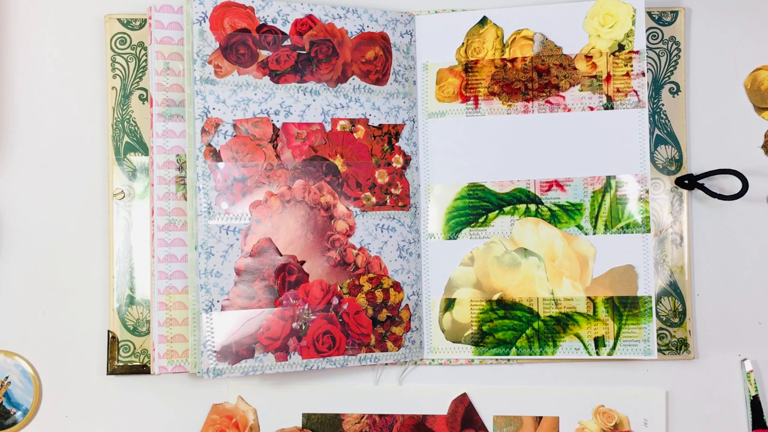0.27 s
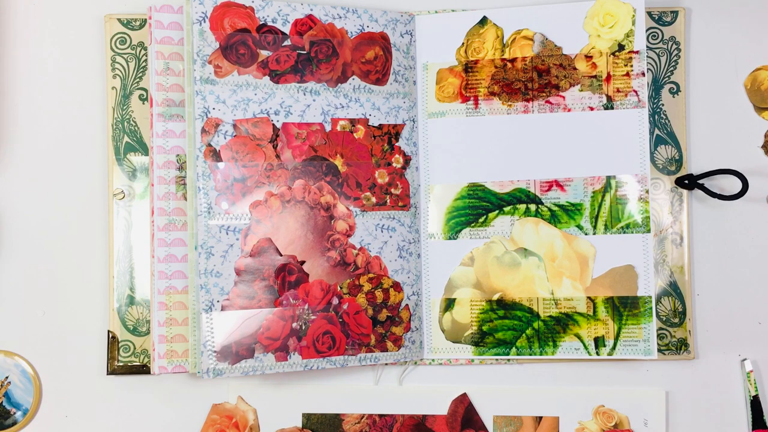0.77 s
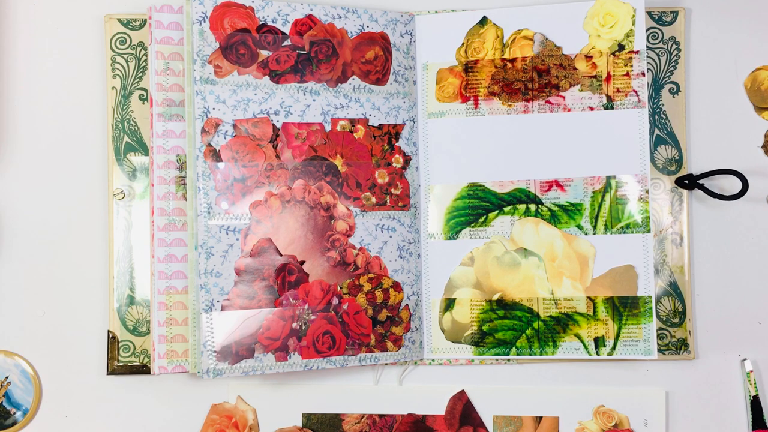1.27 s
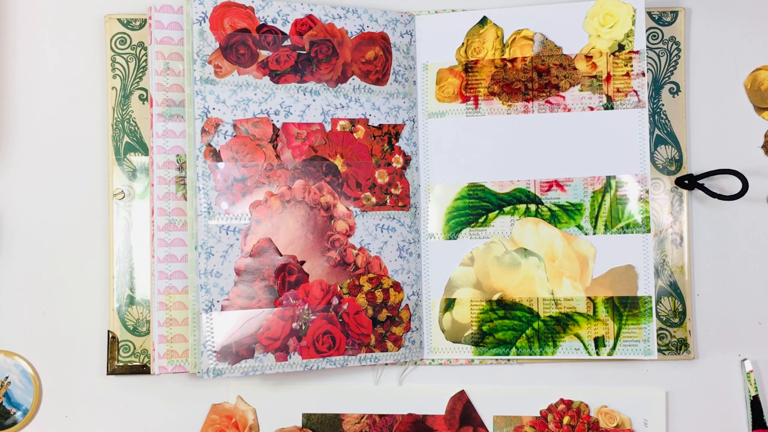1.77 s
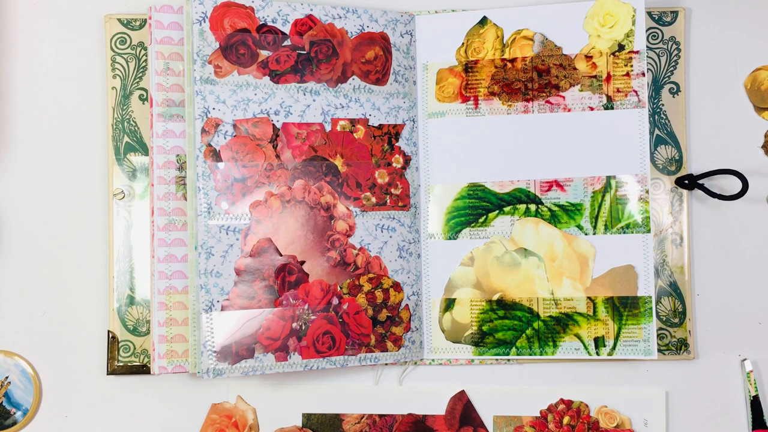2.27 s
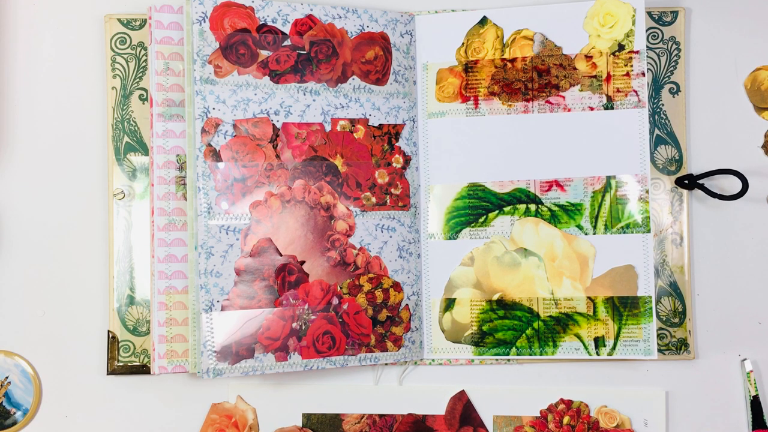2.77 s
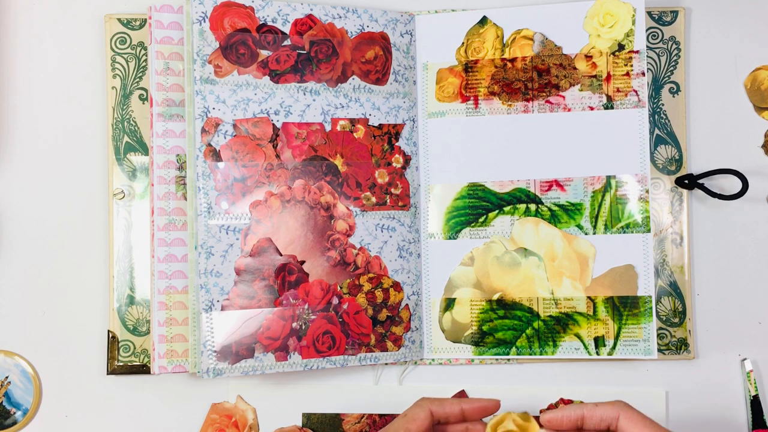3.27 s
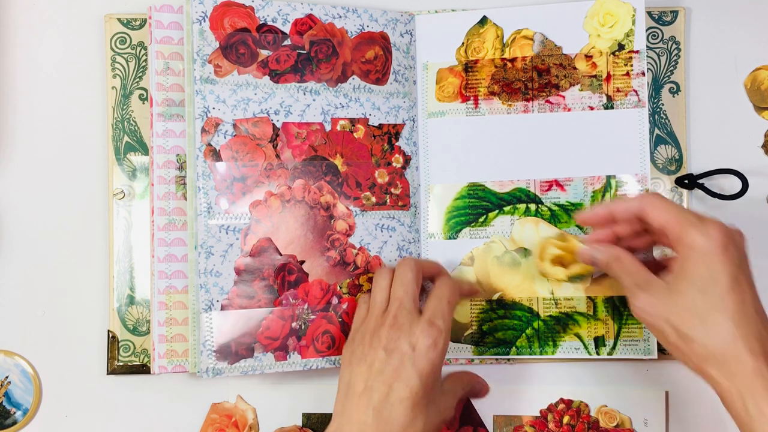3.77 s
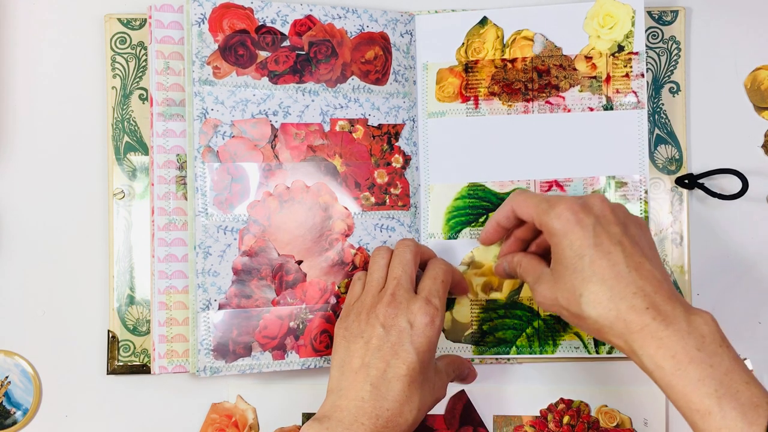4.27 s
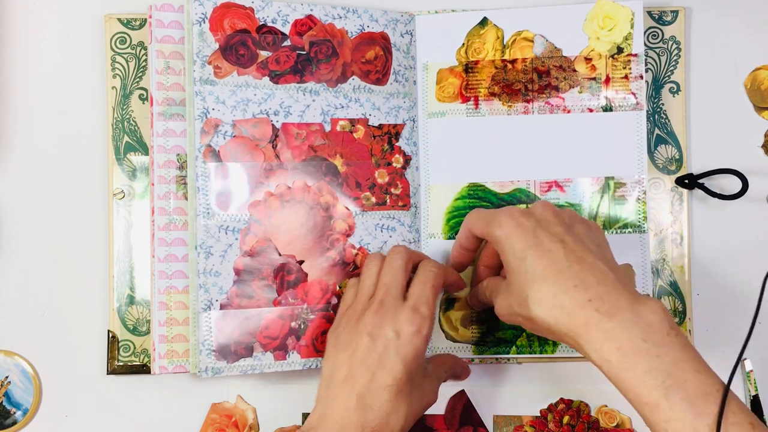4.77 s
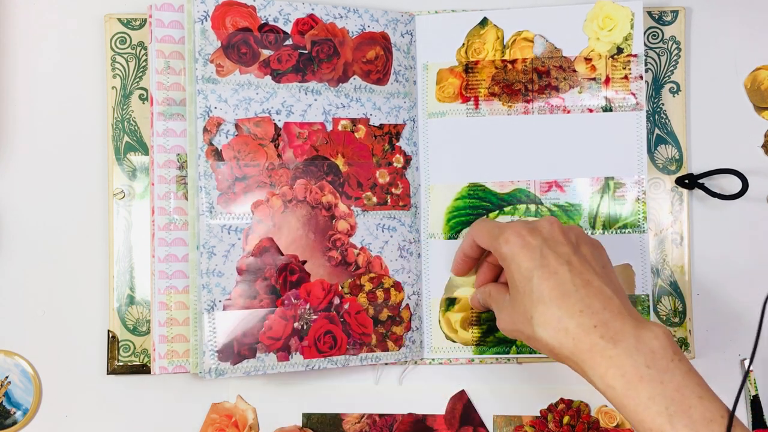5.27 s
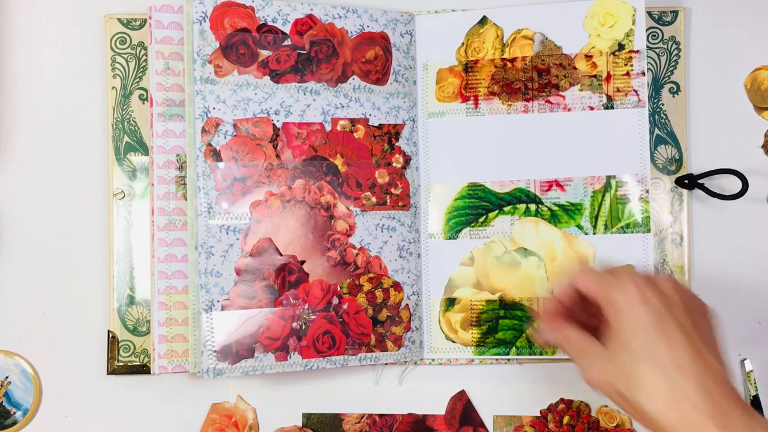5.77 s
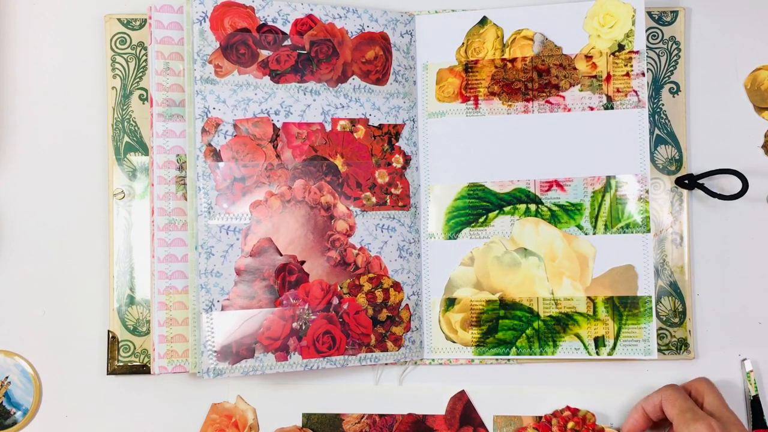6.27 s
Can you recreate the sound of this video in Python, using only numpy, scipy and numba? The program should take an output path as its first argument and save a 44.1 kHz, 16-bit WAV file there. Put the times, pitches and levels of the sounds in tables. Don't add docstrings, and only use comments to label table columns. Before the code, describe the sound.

A close, dry pickup of paper and plastic in a small quiet room with soft low rumble, hiss, faint hum and a very distant engine drone. From 0 to 0.5 seconds paper rustles lightly on film with tiny ticks, then nearly stops. At about 1 second crackling begins; a sharp crease snap breaks out near 1.27, followed by grainy scuffs and small ticks to 1.6. Around 1.9 to 2.2 come brisk rubs, a sleeve brush, a soft fingertip knock and dull board taps. Sparse crackles continue to 3, then a lull. From 3.6 hands brush and paper slides along the pocket, strongest at 4.2 to 4.6, with a loud bright snap at 4.69. It thins to faint rubbing, small ticks near 5.6 and 5.7, then a crisp scuff and sharp tick at 6.3 before settling.

```python
import sys
import numpy as np
from scipy import signal
from scipy.fft import rfft, irfft, next_fast_len
from scipy.io import wavfile
from scipy.ndimage import uniform_filter1d
from numba import njit

SR = 44100
rng = np.random.default_rng(int(sys.argv[2]) if len(sys.argv) > 2 else 0)


def wav_out(sig):
    wavfile.write(sys.argv[1], SR, np.round(np.clip(np.atleast_2d(sig).T, -1, 1) * 32767).astype(np.int16))


def to_linear_factor(level_db):
    exponent = np.asarray(level_db, float) / 20
    return 10 ** exponent


N = 287001
T = np.arange(N) / SR


def noise(*shape):
    return rng.standard_normal(shape or N)


def level(x, db):
    return x * to_linear_factor(db) / np.sqrt(np.mean(x ** 2))


def curves(table):
    s, *columns = np.transpose(table)
    return [np.interp(T, s, c) for c in columns]


def shape(x, gain):
    count = x.shape[-1]
    size = next_fast_len(count)
    hz = np.fft.rfftfreq(size, 1 / SR) + 0.0011
    return irfft(rfft(x, size) * gain(hz), size)[..., :count]


def band(x, lo_hz, hi_hz, order=2):
    def gain(f):
        low_side = 1 + (lo_hz / f) ** (2 * order)
        high_side = 1 + (f / hi_hz) ** (2 * order)
        return 1 / np.sqrt(low_side * high_side)

    y = shape(x, gain)
    return y / np.sqrt(np.mean(y ** 2, axis=-1, keepdims=True))


@njit
def moving_resonance(x, hz, q):
    y, b, l = np.empty(len(x)), 0., 0.
    for i in range(len(x)):
        g = np.tan(np.pi * hz[i] / SR)
        v = (b + g * (x[i] - l)) / (1 + g * (g + 1 / q))
        b, l, y[i] = 2 * v - b, l + 2 * g * v, v / q
    return y


def walk(rate):
    hold = int(SR / rate)
    steps = np.repeat(rng.standard_normal(N // hold + 1), hold)
    return 1.33 * uniform_filter1d(uniform_filter1d(steps, hold), hold)[:N]


def strokes(table, attack_s, release_s, extra_db=0):
    start_s, length_s, from_db, to_db = np.transpose(table)[:4, :, None]
    coarse = T[::32]
    t = coarse - start_s + attack_s / 2
    gate = np.clip(np.minimum(t / attack_s, (length_s + release_s - t) / release_s), 0, 1)
    lean_db = from_db + (to_db - from_db) * np.clip(t / length_s, 0, 1)
    return np.interp(T, coarse, np.sum(gate ** 2 * to_linear_factor(extra_db + lean_db), axis=0))


def kinds(tables, shared):
    rows = [(*row, *extra) for table, extra in zip(tables, shared) for row in table]
    return np.array(rows).T[..., None]


def add(out, s, rows):
    for k, row in zip((s * SR).astype(int), rows):
        out[k:k + len(row)] += row
    return out


# pitch_hz [Hz], level_db [dB per Hz]
HISS_COLOUR = [(88, -37), (150, -8.5), (375, -6), (464, -8), (522, -10), (1710, -18), (2000, -14),
               (2340, -17), (2680, -18), (3020, -18.5), (15800, -21.5)]
# start_s [s], level_db [dB]
DRAUGHT_GUSTS = [
    (0, -47.5),
    (2.01, -47),
    (2.75, -51),
    (3.48, -44.5),
    (5.64, -45),
    (6.51, -47.5),
]


def room():
    hz, db = np.transpose(HISS_COLOUR)
    hiss = shape(noise(), lambda f: to_linear_factor(np.interp(np.log(f), np.log(hz), db)))
    plant_s, plant_slew_s = 2.22, 0.34
    load = 1 / (1 + np.exp((plant_s - T) / plant_slew_s))
    rumble_db, hum_db = -55 - 5.5 * load, -66.5 + 2 * load
    draught_db, = curves(DRAUGHT_GUSTS)
    draught = band(noise(), 3.8, 13.2, order=4) * to_linear_factor(draught_db)
    rumble = 1.05 * band(noise(), 9.8, 36, order=4) + 0.61 * band(noise(), 31, 53, order=3)
    hum = band(noise(), 95.7, 86.3, order=3) * to_linear_factor(hum_db - 0.5)
    return level(hiss, -74.6) + draught + rumble * to_linear_factor(rumble_db - 3.5) + hum


# start_s [s], pitch_hz [Hz], level_db [dB]
ENGINE_RUN = [
    (0, 107, -78.5),
    (.9, 111.9, -68.5),
    (2, 113.5, -75),
    (2.9, 120.7, -68),
    (3.5, 127.9, -79.5),
    (3.95, 137, -76),
    (4, 87.55, -81),
    (4.6, 96.1, -67),
    (5.5, 100.6, -70),
    (6.51, 102, -73.5),
]


def engine():
    hz, db = curves(ENGINE_RUN)
    turn = 2 * np.pi * np.cumsum(hz * (1 + 0.014 * walk(9))) / SR
    strong = np.sin(turn) * to_linear_factor(2.9 * walk(7.7))
    octave_below = np.sin(turn / 2) * to_linear_factor(4.0 + 2.4 * walk(4.16))
    return to_linear_factor(db + 4.5) * (strong + octave_below)


def walls(x, t60_s, wet_db):
    t = T[:SR // 4]
    tail = noise(len(t)) * np.exp(-np.log(1000) * t / t60_s) * np.minimum(t / 0.0014, 1)
    return x + to_linear_factor(wet_db) * signal.fftconvolve(x, tail / np.sqrt(np.sum(tail ** 2)))[:N]


# start_s [s], length_s [s], start_level_db [dB], end_level_db [dB]
SLEEVE_BRUSHES = [(0, 0.58, -94, -87), (0.932, 0.39, -84, -79), (1.973, 0.37, -77, -68.5),
                  (2.317, 0.4, -70.5, -73), (2.78, 0.16, -80, -89), (3.537, 0.46, -75, -78),
                  (4.036, 0.19, -67, -86), (4.215, 0.54, -71.5, -77), (4.9, 0.57, -84, -82),
                  (5.5, 0.34, -79.5, -69.5), (5.87, 0.29, -80, -88), (6.3, 0.099, -80, -78)]


def hands():
    cloth = noise() * to_linear_factor(1.83 * walk(90))
    press = strokes(SLEEVE_BRUSHES, attack_s=0.074, release_s=0.073) + to_linear_factor(-80.5)
    rustle = band(cloth, 220, 300) + 0.68 * band(cloth, 630, 740) + 0.27 * band(cloth, 820, 3000)
    brush = rustle * to_linear_factor(-5.5) * press
    knock_s, knock_hz, knock_db, knock_ms = 2.0743, 256, -38, 3
    approach_db, approach_ms = -49.5, 4.4
    before, t = np.minimum(T - knock_s, 0), np.maximum(T - knock_s, 0)
    approach = -to_linear_factor(approach_db) * (T < knock_s) * np.exp(before * 1000 / approach_ms)
    ring = np.cos(2 * np.pi * knock_hz * t)
    ring = ring + 0.74 * np.cos(2 * np.pi * 110 * t) + 0.28 * np.cos(2 * np.pi * 520 * t)
    knock = to_linear_factor(knock_db - 5) * ring * t / (t + 0.0001) * np.exp(-t * 1000 / knock_ms)
    return brush + approach + knock


# start_s [s], peak_level_db [dB], pitch_hz [Hz]
BOARD_NUDGES = [(.985, -70, 705), (1.014, -63, 770), (1.228, -64, 700), (1.245, -61, 706),
                (1.311, -60, 690), (1.421, -66, 830), (2.011, -62, 727), (2.054, -64, 700),
                (2.197, -53.5, 750), (2.538, -64, 730), (2.564, -56, 714), (4.155, -53, 720),
                (4.306, -63, 684), (6.327, -57, 817)]


def board():
    s, db, hz = np.transpose(BOARD_NUDGES)[..., None]
    attack_ms, decay_ms = 1.3, 6.7
    t = T[:2048]
    fade = (1 - np.exp(-t * 1000 / attack_ms)) * np.exp(-t * 1000 / decay_ms)
    ring = np.sin(2 * np.pi * hz * t) * fade
    return add(np.zeros(N + SR), s[:, 0], to_linear_factor(db + 2.5) * ring)[:N]


# start_s [s], peak_level_db [dB], pitch_hz [Hz], top_octave_db [dB]
CREASE_SNAPS = [(1.2649, -19.5, 6850, -34), (1.2685, -32, 7050, -20), (1.2718, -24.5, 5260, -5),
                (1.274, -30.5, 8220, -8), (1.5895, -43, 4720, -34), (1.8446, -39, 6400, -38),
                (2.0253, -32.5, 5900, -27), (2.0554, -39, 5860, -28), (2.074, -36, 2080, -12),
                (2.7029, -36.5, 1870, -46), (2.9394, -28.5, 7660, -21), (6.0028, -48, 4990, -32),
                (6.3924, -42.5, 7600, -7)]
BRIGHT_TICKS = [(.0382, -41.5, 8350, -13), (.0994, -48, 6750, -17), (.301, -43, 8360, -9),
                (.9847, -50, 7940, -15), (1.0448, -32.5, 4800, -34), (1.057, -46, 5210, -20),
                (1.113, -50, 7500, -17), (1.222, -44, 4500, -15), (2.121, -50, 5500, -20),
                (1.3164, -42, 4840, -19), (1.3273, -37.5, 4500, -35), (1.9714, -55, 6160, -22),
                (2.3318, -46.5, 7600, 4), (2.947, -42, 7960, -18), (4.3094, -44, 6610, 0),
                (4.5107, -47, 4300, -23), (4.6888, -15.5, 4400, -7), (4.879, -55, 4300, -13),
                (5.6362, -37, 5250, -6)]
DULL_TICKS = [(0.398, -50, 3510, -11), (1.0103, -42, 3400, -8), (1.306, -44.5, 3150, -19),
              (1.477, -50.5, 2903, -24), (1.4994, -51, 2920, -17), (1.5152, -54, 2660, -21),
              (1.5452, -39, 3100, -19), (2.175, -41, 3040, -29), (2.5361, -52, 2100, -21),
              (2.579, -44, 2140, -20), (2.6732, -44, 1700, -4), (2.9541, -37, 2370, -5),
              (4.038, -45, 3250, -10), (4.198, -53, 1840, -11), (5.7326, -38.5, 2030, -12),
              (5.879, -58, 2450, -6), (6.0874, -43.5, 3380, -21), (6.4017, -55.5, 2950, -14),
              (6.411, -47.5, 3530, -8), (6.469, -54, 1665, 18)]
TAPPING_TICKS = [(.8594, -55.5, 2970, -17), (1.0952, -42, 4670, -31), (1.424, -44.5, 7130, -21),
                 (1.5304, -50, 7370, -8), (1.8018, -53.5, 3050, -36), (2.1953, -40, 3500, -3),
                 (2.3361, -45.5, 2900, -14), (2.4354, -57, 1520, -26), (2.5627, -42.5, 6980, -28),
                 (3.0093, -55, 2300, -28), (3.1501, -46, 3980, -39), (3.737, -46, 4500, -13),
                 (4.136, -40.5, 2760, -10), (4.1558, -41, 1780, -7), (4.9841, -57, 1980, -22),
                 (5.0612, -48.5, 1640, -13), (6.3248, -23.5, 8250, -38)]
# page_body_db [dB], noise_t60_ms [ms], noise_db [dB], panel_ring [cycles]
TICK_TRAITS = [
    (-35, 3.4, -4.5, 3),
    (-34, 11.4, -3.5, 3.3),
    (-22, 10.6, 2, 5.4),
    (-14, 8.3, 1.5, 4.4),
]


def ticks():
    tables = CREASE_SNAPS, BRIGHT_TICKS, DULL_TICKS, TAPPING_TICKS
    s, db, hz, top_db, body_db, t60_ms, noise_db, cycles = kinds(tables, TICK_TRAITS)
    t, x = T[:2048], noise(len(s), 2048)
    fade = np.exp(-np.log(1000) * t * 1000 / np.maximum(t60_ms, 1)) * np.minimum(t / 0.00043, 1)
    fade = fade + 0.15 * fade ** 0.27
    burst = band(x, 1570, 7600) + to_linear_factor(top_db + 10.0) * band(x, 8200, 14000, order=4)
    burst = burst + 0.13 * band(x, hz / 0.77, hz * 1.13, order=3)
    panel = np.sin(2 * np.pi * hz * t) * (4000 / hz) ** 0.14
    panel = panel * np.exp(-t * hz / cycles) * np.minimum(t / 0.00015, 1)
    snap = to_linear_factor(noise_db) * burst * fade + 1.33 * panel
    snap = snap / np.abs(snap).max(axis=1, keepdims=True)
    tap = band(x, 390, 760) * np.exp(-t / .004) * np.minimum(t / 0.00054, 1)
    rows = to_linear_factor(db - 1.5) * (snap + to_linear_factor(body_db - 3.5) * tap)
    return add(np.zeros(N + SR), s[:, 0] + .0005, rows)[:N]


def grit(spread_db, flutter_db):
    slip_size = np.minimum(rng.exponential(size=N), 2 * np.pi)
    slips = noise() * to_linear_factor(spread_db * slip_size)
    flutter = to_linear_factor(flutter_db * walk(300) + flutter_db / 2 * walk(55))
    return level(slips * flutter, 0)


# top_s [s], level_db [dB], pitch_hz [Hz], rise_ms [ms], fall_ms [ms]
LOOSE_SCUFFS = [(.125, -56.5, 7500, 24, 32), (.32, -56.5, 8200, 50, 55), (1.226, -53, 7000, 1.6, 50),
                (1.552, -54, 11300, 3.5, 5.1), (1.588, -57, 5870, 7.7, 13), (2.031, -44.5, 6350, 13, 14),
                (2.05, -49, 6400, 9.3, 4), (2.128, -50.5, 7000, 7.4, 23.5), (2.19, -58, 9100, 9, 15),
                (2.337, -76, 8050, 3, 5.8), (2.66, -64.5, 7250, 16, 10), (2.955, -55.5, 6000, 8.1, 9.7),
                (3.6, -68, 12000, 18, 36), (4.905, -62, 5200, 7.6, 18), (4.93, -63, 8000, 13, 6),
                (5.619, -56, 5545, 6.1, 6), (5.638, -61.5, 9100, 4.5, 14.6), (6.163, -59.5, 8900, 18, 22),
                (6.245, -63, 7000, 7.3, 19)]
PRESSED_SCUFFS = [(1.013, -56.5, 5000, 2.6, 7.5), (1.046, -52.5, 5400, 6.2, 9.5),
                  (1.311, -57, 4500, 2.8, 11), (1.85, -65.5, 8000, 2.2, 23), (1.95, -63, 7460, 7, 10),
                  (3.19, -66.5, 4540, 31, 25), (4.068, -56.5, 3590, 9.1, 13), (4.152, -55, 4100, 14, 12),
                  (4.181, -56, 7960, 7.2, 7.9), (4.31, -60.5, 1500, 9.2, 4.4), (4.715, -59, 5000, 7, 9.1),
                  (5.888, -61, 12100, 5.3, 10), (6.322, -45.5, 6860, 5.3, 13), (6.35, -55, 9000, 6.8, 10)]


def scuffs(fibres):
    page_body_db = [-17.5], [-2.5]
    s, db, hz, rise_ms, fall_ms, body_db = kinds((LOOSE_SCUFFS, PRESSED_SCUFFS), page_body_db)
    lead = 4096
    k = np.arange(3 * lead)
    ms = (k - lead) * 1000 / SR
    x = fibres[(k + (s * SR).astype(int)) % N]
    swell = 2 / (np.exp(-ms / np.maximum(rise_ms, 1)) + np.exp(ms / np.maximum(fall_ms, 1)))
    patch = band(x, hz / 1.52, hz * 1.46, order=3)
    hiss = to_linear_factor(-9.5) * band(x, 1800, 12000, order=3)
    page = to_linear_factor(body_db) * band(x, 270, 1380)
    rows = to_linear_factor(db - 6.0) * swell ** 1.4 * (patch + hiss + page)
    return add(np.zeros(N + SR), s[:, 0], rows)[lead:N + lead]


# start_s [s], sheet_pitch_hz [Hz], pocket_pitch_hz [Hz], ringing_db [dB]
GRIPS = [(0, 3170, 7900, -7.5), (.24, 3150, 7940, 0), (.55, 3300, 7400, -6), (.97, 3250, 7550, -7.5),
         (1.2, 3270, 7400, -15), (1.29, 3180, 7400, -4), (1.33, 3020, 7300, -6), (1.43, 3050, 7640, -9),
         (1.9, 3680, 7550, -4.5), (2.09, 3240, 7060, -8), (2.165, 3400, 8100, -17), (2.6, 4400, 8000, -2),
         (2.75, 2420, 7600, -15), (2.93, 2860, 7550, -12), (3.1, 3000, 7300, -7), (3.5, 2550, 9300, -15),
         (4.05, 2810, 6900, -23), (4.21, 2860, 6850, -9), (4.329, 4500, 7100, -15),
         (4.44, 4950, 7100, -5.5), (4.67, 4740, 8000, -3), (4.8, 4850, 9600, -3), (4.96, 3020, 8100, -7),
         (5.85, 3080, 9220, -15), (6.1, 3170, 7700, -6.5), (6.3, 3100, 7930, 3)]


def sheet(x):
    s, *columns = np.transpose(GRIPS)
    current = np.maximum(np.searchsorted(s, T, "right") - 1, 0)
    low, high, ring_db = (uniform_filter1d(c[current], size=800) for c in columns)
    modes = low, 1.556 * low, high, 1.352 * high
    plain, wobble, sharpness = .5, .01, (5., 7., 9., 11.)
    rings = 0
    for hz, q in zip(modes, sharpness):
        ring = moving_resonance(x, hz * (1 + wobble * walk(8)), q)
        rings = rings + ring * to_linear_factor(1.7 * walk(25)) * (5000 / hz) ** 0.25
    return (plain * x + to_linear_factor(ring_db) * rings) / (plain + 0.65 * to_linear_factor(ring_db))


# [dB, above 8 kHz against friction]
PAPER_STROKES = [(0, .04, -69, -66.5, 1), (0.041, 0.22, -66.5, -67, 1.5), (0.241, 0.27, -73.5, -77.5, 2),
                 (0.949, .23, -83.5, -63.5, 0), (1.201, .22, -60.5, -62.5, -4),
                 (1.435, 0.13, -68.5, -81.5, -2), (1.849, .16, -78, -65, -17), (2.128, 0.18, -58, -75, -6),
                 (2.358, 0.21, -85, -87, 1), (2.56, .1, -81, -75.5, 6), (2.78, 0.23, -72, -83, -2),
                 (3.546, 0.15, -77, -75.5, -6), (3.69, 0.32, -68, -82, -9), (4.03, 0.19, -74, -75, 1.5),
                 (4.231, 0.14, -61.5, -69.5, -6), (4.373, 0.24, -64, -63, -11),
                 (4.637, 0.33, -76.5, -80.5, -12), (4.984, 0.65, -78, -93, -11), (5.72, .12, -77, -83, -15),
                 (6.14, 0.16, -69, -74, 0), (6.29, 0.11, -80, -81, -1)]


def slide(fibres):
    attack_s, release_s, resting_db, resting_air_db = 0.047, 0.087, -85, -90.5
    air_db = np.array(PAPER_STROKES)[:, -1:]
    friction = strokes(PAPER_STROKES, attack_s, release_s) + to_linear_factor(resting_db)
    air = strokes(PAPER_STROKES, attack_s, release_s, air_db) + to_linear_factor(resting_air_db)
    hiss = band(fibres, 1940, 7800, order=3) * friction * to_linear_factor(-1.0)
    return hiss + band(fibres, 9000, 11800, order=4) * air


def scene():
    smooth, coarse = grit(spread_db=1.6, flutter_db=1.3), grit(spread_db=2.2, flutter_db=1.4)
    paper = sheet(slide(smooth) + scuffs(coarse) + ticks())
    near = walls(paper + hands() + board(), t60_s=0.056, wet_db=-11.5)
    return (near + room() + engine())[None]


def top_cut(x):
    return signal.sosfilt(signal.butter(12, 16540, fs=SR, output="sos"), x)


def record(dry):
    top_hz = 15850
    mix = shape(dry, lambda hz: 1 / (1 + (hz / top_hz) ** 100))
    return top_cut(mix)


dry = scene()
out = record(dry)
wav_out(out)
```